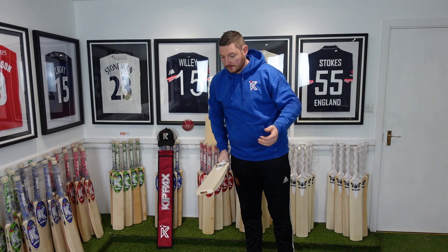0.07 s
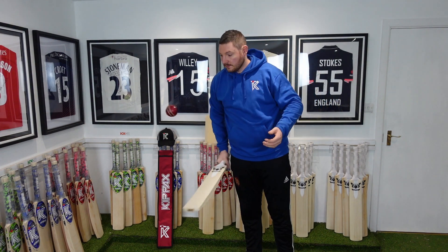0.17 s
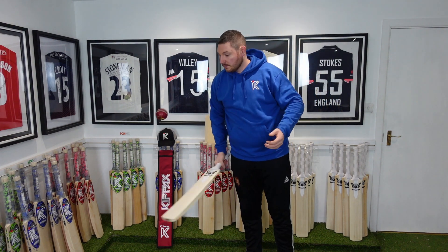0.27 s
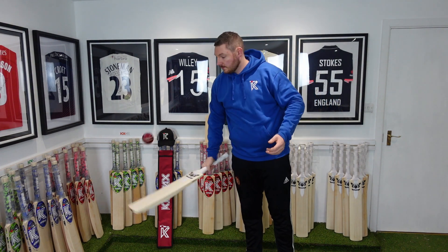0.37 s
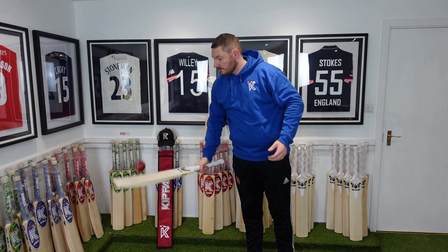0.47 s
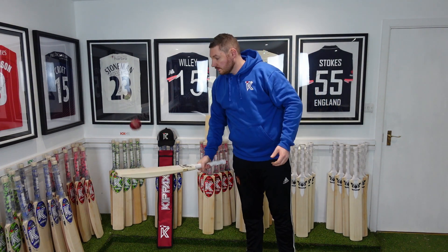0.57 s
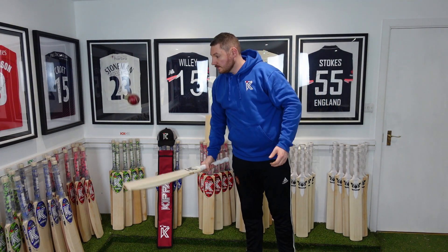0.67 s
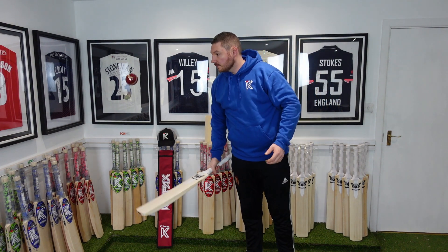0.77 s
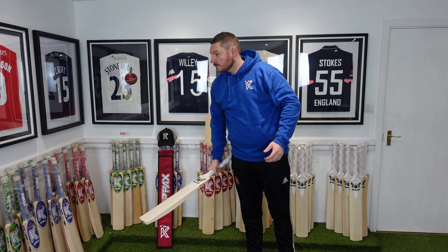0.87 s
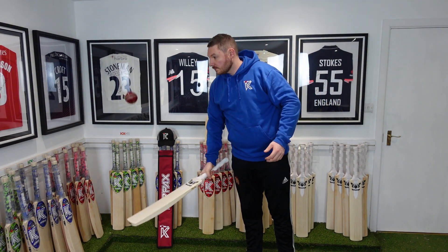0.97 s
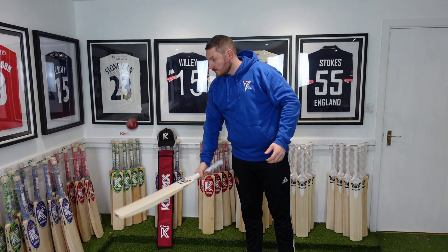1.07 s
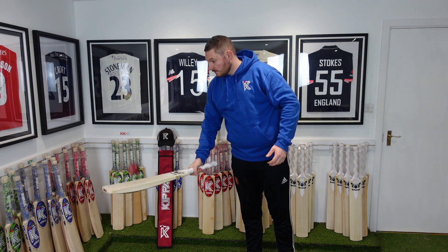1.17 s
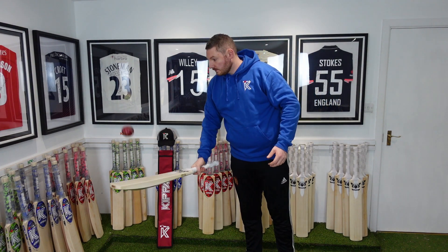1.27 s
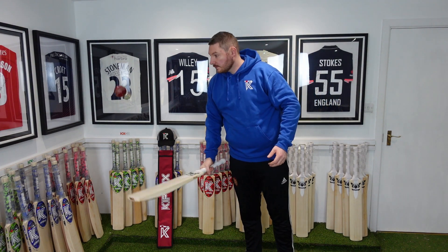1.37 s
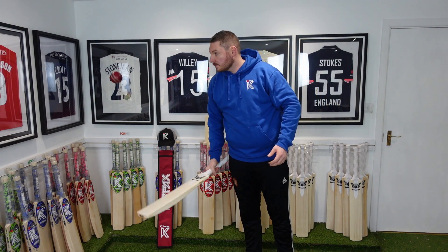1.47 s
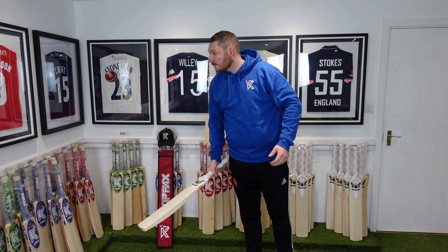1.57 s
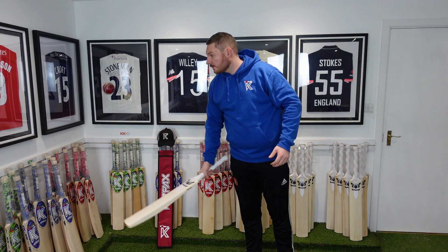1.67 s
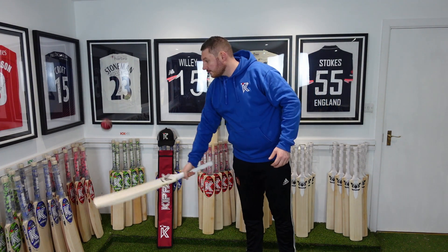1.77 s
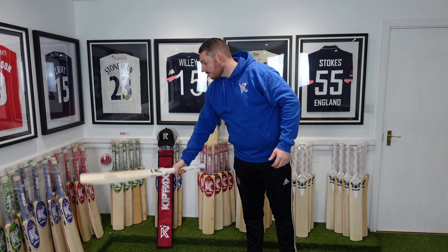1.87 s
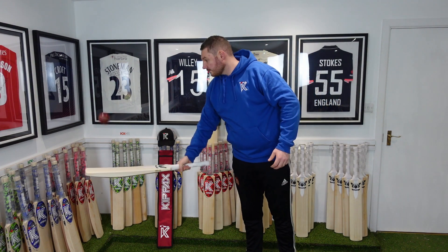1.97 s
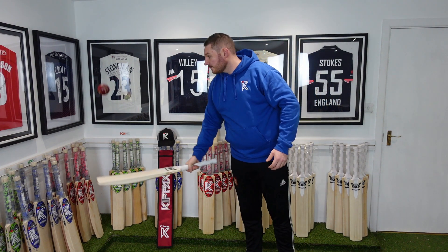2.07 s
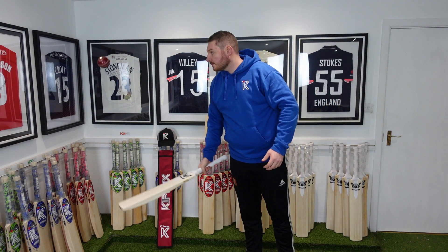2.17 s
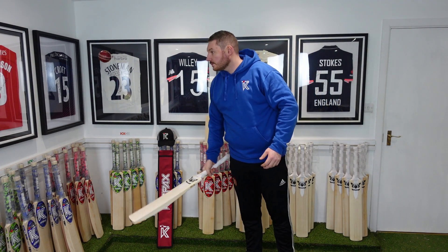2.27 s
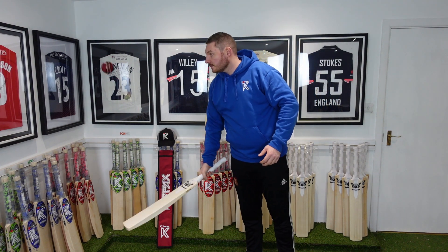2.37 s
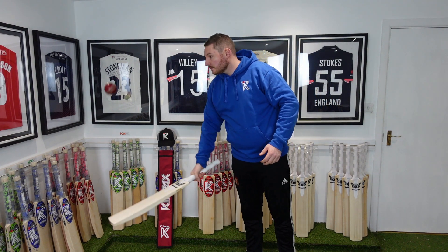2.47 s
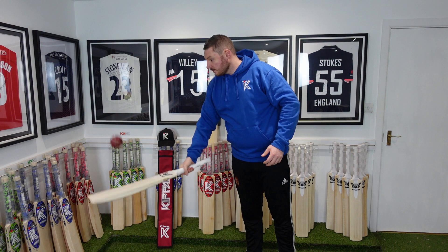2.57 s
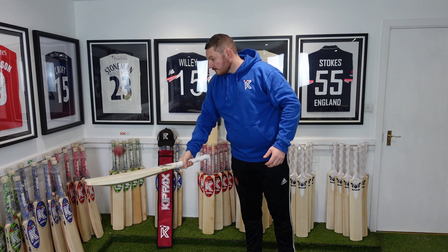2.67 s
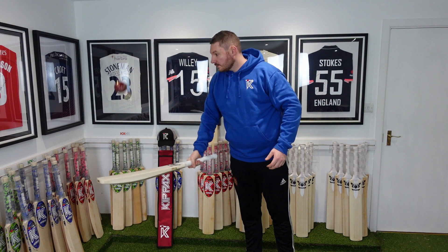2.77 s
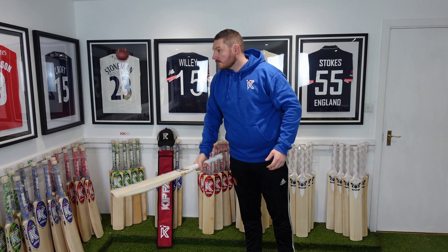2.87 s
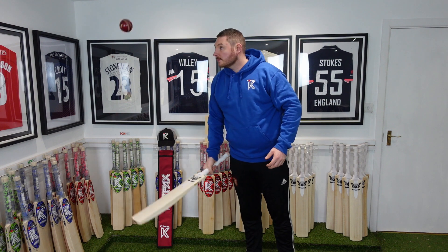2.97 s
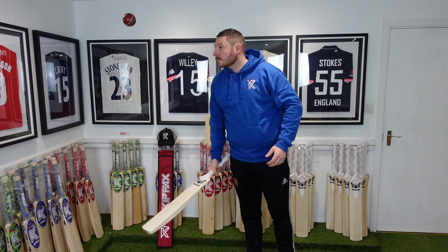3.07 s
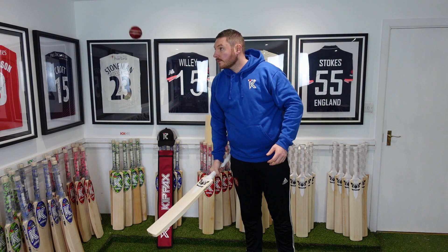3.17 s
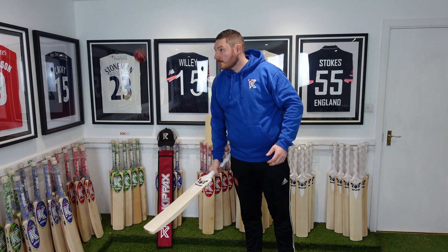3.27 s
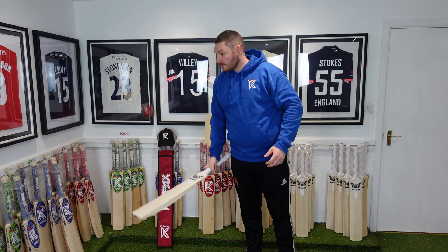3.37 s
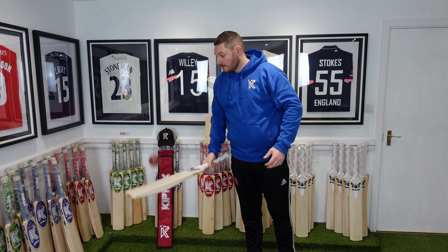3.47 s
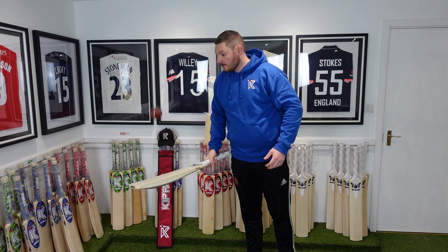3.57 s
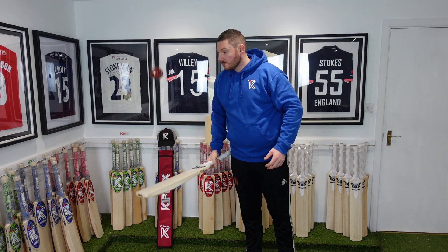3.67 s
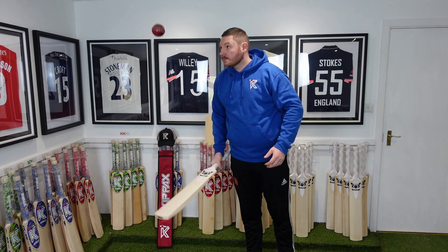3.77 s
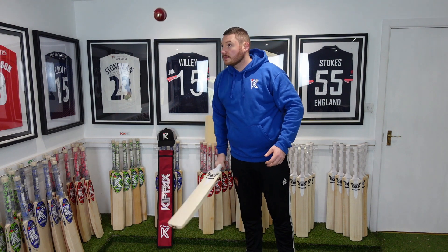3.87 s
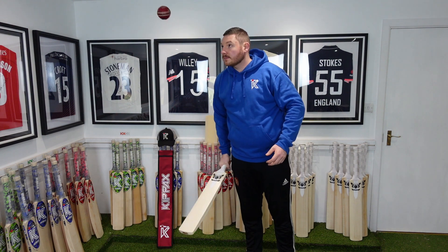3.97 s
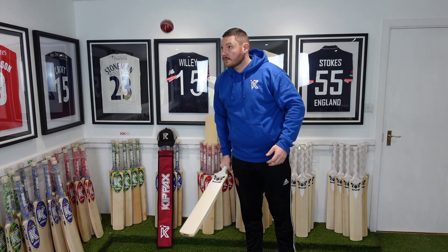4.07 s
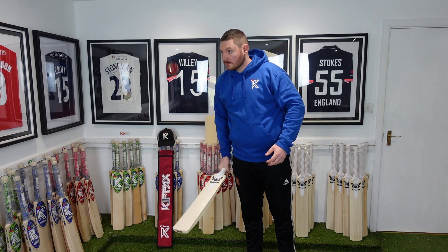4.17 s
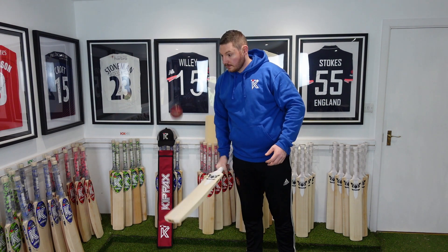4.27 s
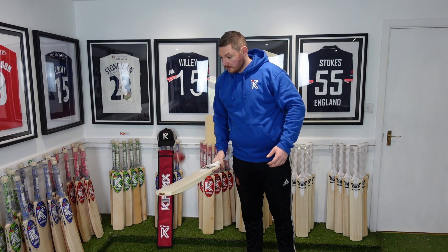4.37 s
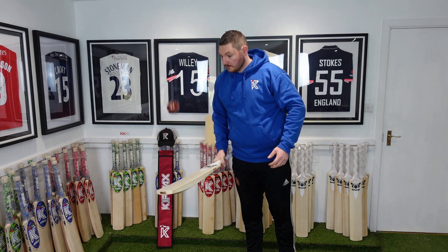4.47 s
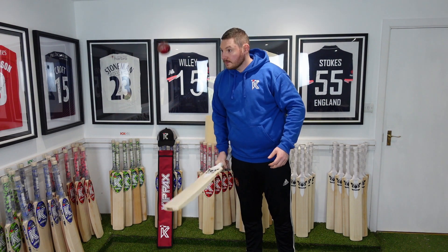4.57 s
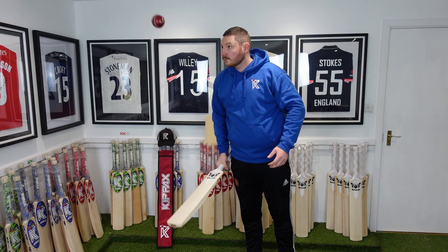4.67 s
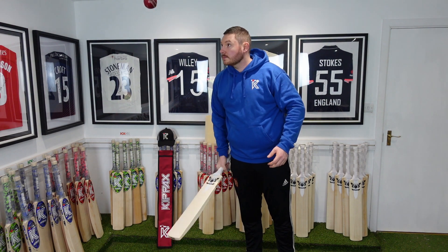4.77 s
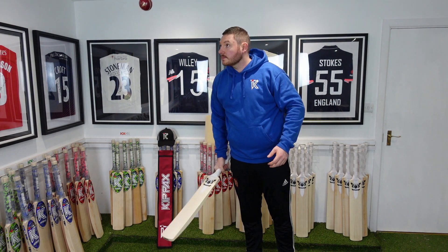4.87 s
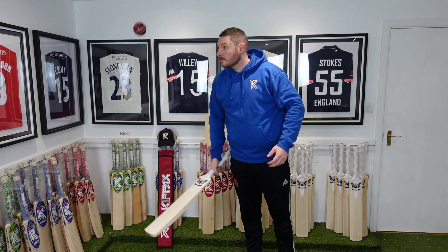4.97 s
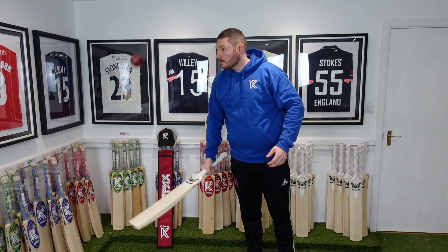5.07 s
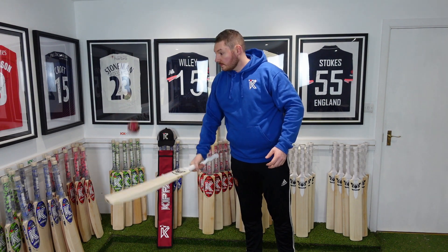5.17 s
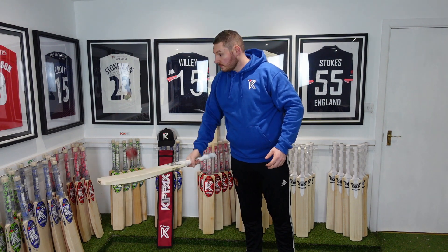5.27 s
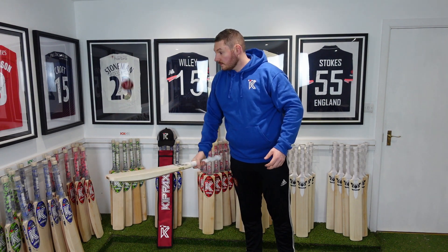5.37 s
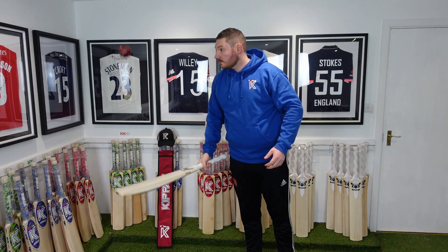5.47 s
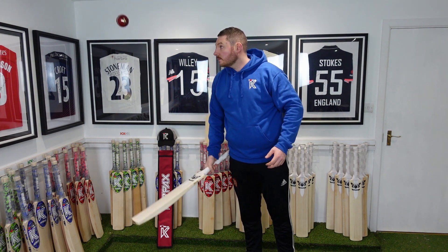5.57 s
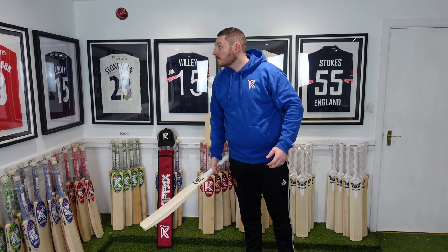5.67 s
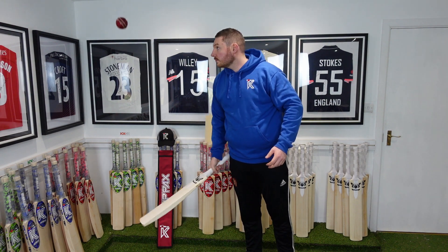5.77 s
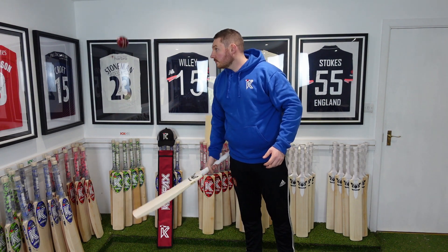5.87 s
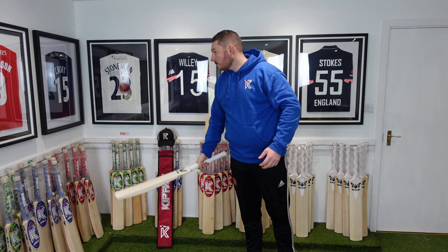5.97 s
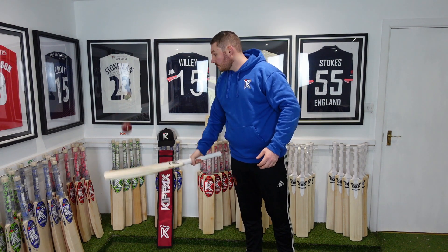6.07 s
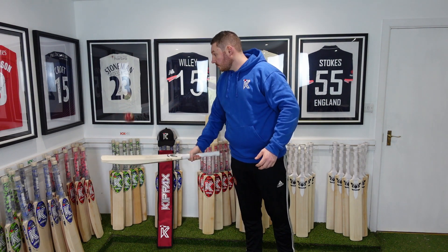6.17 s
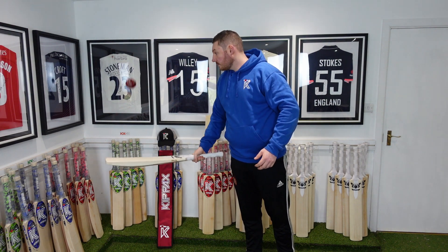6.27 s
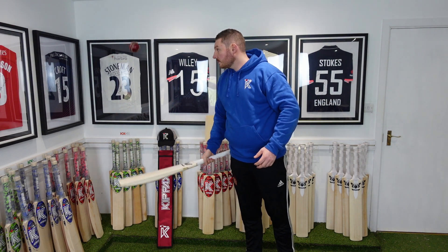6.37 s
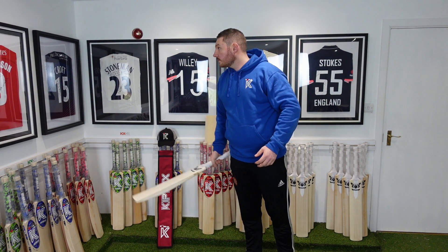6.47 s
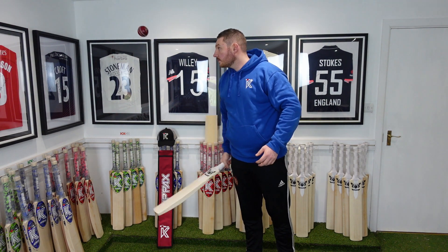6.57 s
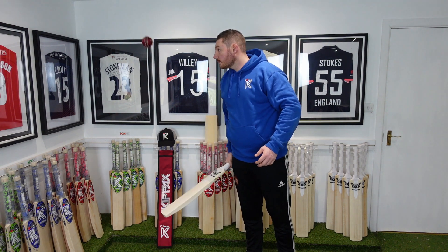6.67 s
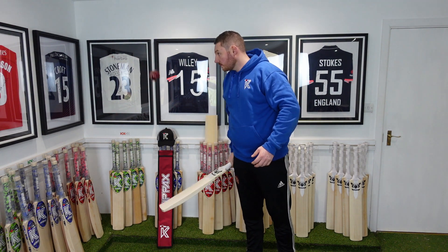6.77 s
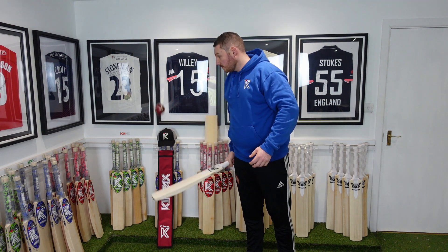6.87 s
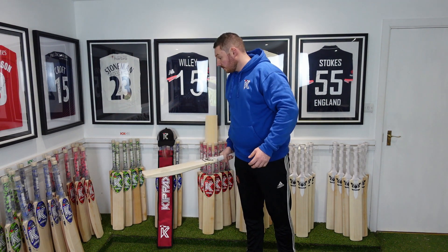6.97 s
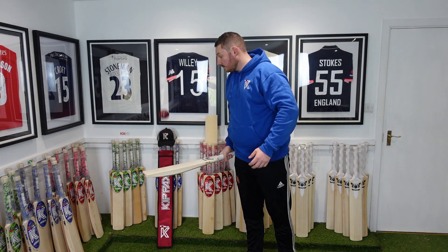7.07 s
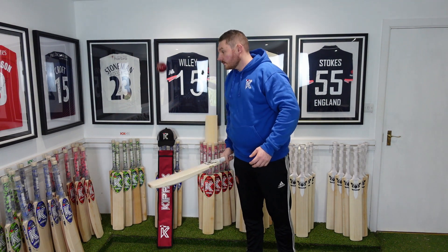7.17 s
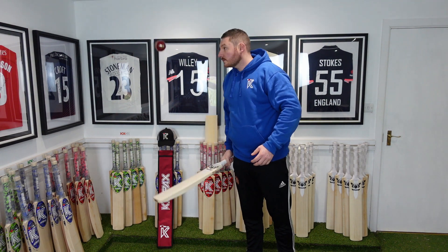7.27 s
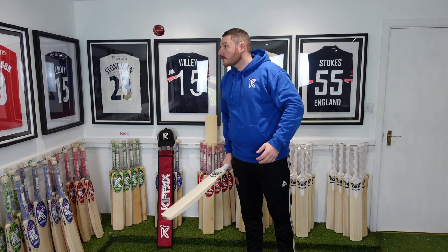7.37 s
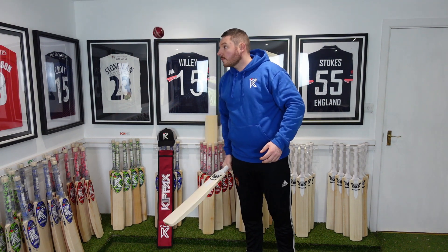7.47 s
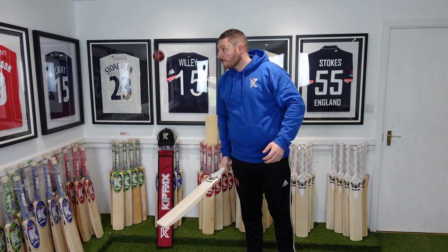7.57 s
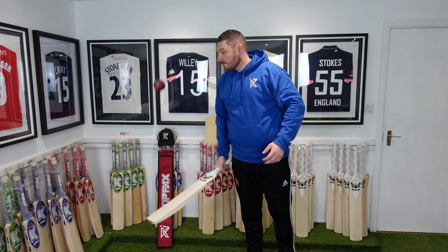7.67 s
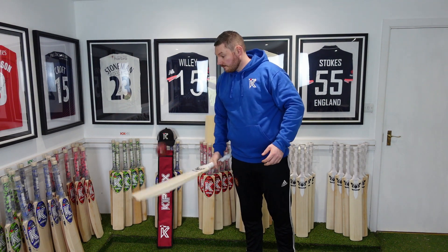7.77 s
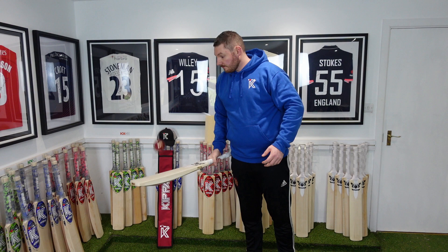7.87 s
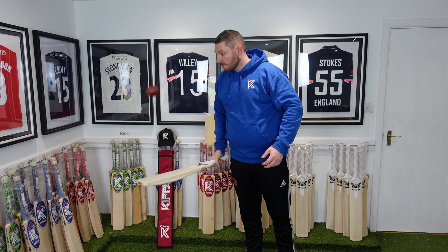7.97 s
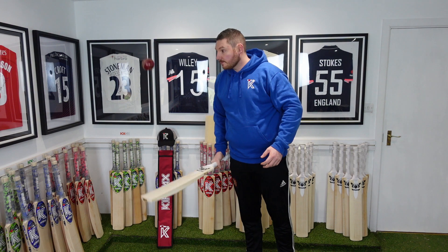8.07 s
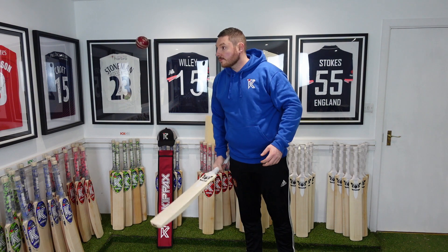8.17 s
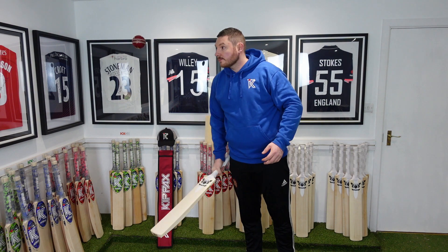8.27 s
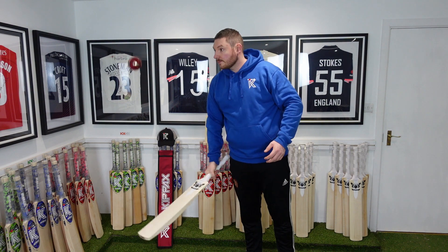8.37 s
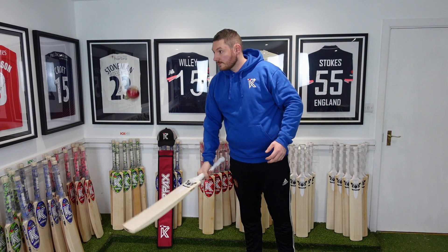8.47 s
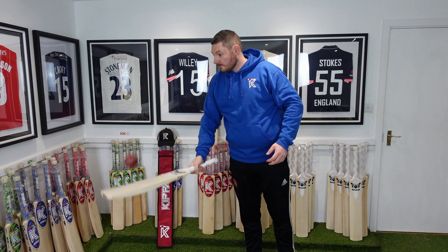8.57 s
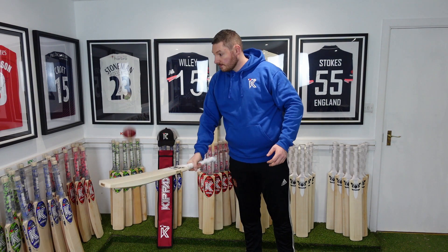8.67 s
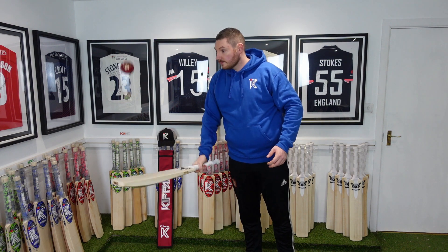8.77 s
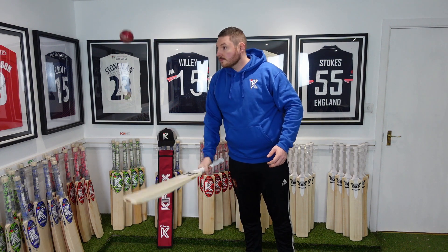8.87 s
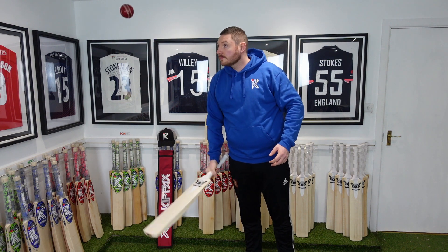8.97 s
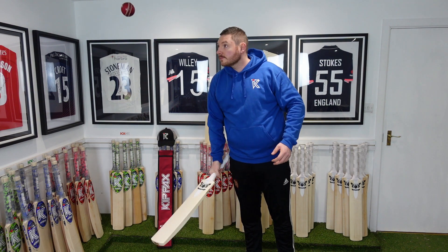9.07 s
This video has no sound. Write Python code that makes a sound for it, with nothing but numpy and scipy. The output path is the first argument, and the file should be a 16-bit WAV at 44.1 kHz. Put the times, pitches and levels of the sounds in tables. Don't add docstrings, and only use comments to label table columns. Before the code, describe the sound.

Sharp wooden knocks repeat for about nine seconds as someone keeps a hard ball bouncing on a bat. Early hits are rounder and woodier, middle ones brighter and more cracking, the last fuller again. Each leaves a short lively indoor tail with a faint sympathetic hum. Between them sit quiet traffic rumble, small shuffles and, near the end, a thin far-off brake squeal. Close stereo pickup, with the peaks tightly held down.

```python
import sys
import numpy as np
from scipy import signal
from scipy.io import wavfile
from scipy.ndimage import uniform_filter1d, minimum_filter1d

SR = 44100
rng = np.random.default_rng(int(sys.argv[2]) if len(sys.argv) > 2 else 0)


def attenuation_scalar(level_db):
    decades = np.asarray(level_db, float) / 20
    return 10 ** decades


def wrap_up_sound(samples):
    columns = np.atleast_2d(samples).T
    tamed = np.clip(columns, -1, 1)
    steps = np.round(tamed * 32767).astype(np.int16)
    wavfile.write(sys.argv[1], SR, steps)


N = 402633
RING = int(0.85 * SR)
THIRD_OCTAVES_HZ = 22 * 2 ** np.arange(0, 9.7, 1 / 3)


def at_hz(points, hz, axis=1):
    points = np.array(points)
    return np.interp(np.log(hz), np.log(points[:, 0]), points[:, axis])


def rms_one(x):
    return x / np.sqrt(np.mean(x ** 2) + 1e-20)


def band(x, low_hz, high_hz):
    sos = signal.butter(2, [low_hz, min(high_hz, 0.45 * SR)], "band", fs=SR, output="sos")
    return signal.sosfilt(sos, x)


def mode(hz, t60, t):
    return np.sin(2 * np.pi * hz * t) * attenuation_scalar(-60 * t / t60)


def add(out, x, start_s):
    i = max(round(start_s * SR), 0)
    out[:, i:i + x.shape[-1]] += x[..., :N - i]


# pitch_hz [Hz], level_db [dB], t60_s [s]
BLADE = [(348, -16.5, 0.033), (686, -3, 0.011), (850, -8.5, 0.0075), (1053, -8.5, 0.026), (1280, 2, 0.023),
         (1420, -4.5, 0.057)]


def push(db, low_db, t):
    contact_ms = 1.004 * attenuation_scalar(0.49 * (-16 - db))
    force = np.sin(np.pi * np.minimum(t * 1000 / contact_ms, 1)).clip(0) ** 2
    blade = 0
    for hz, level_db, t60 in BLADE:
        luck_db = 1.6 * rng.standard_normal()
        lean_db = low_db * np.log2(700 / hz)
        blade = blade + attenuation_scalar(level_db + lean_db + luck_db) * mode(hz, t60, t)
    air = -np.gradient(force) * attenuation_scalar(19.5)
    bend = np.convolve(force, blade)[:len(t)] * attenuation_scalar(-32.5)
    leather = signal.butter(2, 1700, fs=SR, output="sos")
    return signal.sosfilt(leather, signal.sosfilt(leather, air + bend))


# pitch_hz [Hz], width_hz [Hz], level_db [dB]
FACE = [(2190, 380, -1), (2760, 600, -13), (3160, 580, 1), (3740, 410, 4), (4500, 370, 1), (5300, 710, 3),
        (5900, 350, -2.5), (6800, 510, -7.5), (7210, 430, -3), (8120, 660, 2), (8870, 700, -7.5),
        (10400, 1100, -6.5), (11900, 900, -11), (13500, 3400, -17.5)]


def crack(tilt_db, spot_hz, t):
    scatter_db, spot_db, spot_width_hz = 2.5, -1.5, 280
    luck = np.diff(rng.standard_normal(len(FACE) + 1)) / np.sqrt(2)
    face = 0
    for (hz, width_hz, level_db), a in zip(FACE, luck):
        gain = attenuation_scalar(level_db + tilt_db * np.log2(hz / 4000) + scatter_db * a)
        face = face + gain * mode(hz, 1.3 / width_hz, t)
    peak = signal.iirpeak(spot_hz, spot_hz / spot_width_hz, SR)
    return face + attenuation_scalar(spot_db) * signal.lfilter(*peak, face)


def knock(db, tilt_db, low_db, spot_hz):
    t = np.arange(1500) / SR
    return push(db, low_db, t) - attenuation_scalar(-20 + 0.16 * low_db) * crack(tilt_db, spot_hz, t)


# pitch_hz [Hz], level_db [dB], t60_s [s]
PANES = [(152.4, -39.5, 0.76), (229.8, -34.5, 0.55), (255, -24, 0.58), (303.3, -24, 0.81),
         (327, -19.5, 0.74), (349.3, -26, 0.69), (394, -25, 0.4), (412.6, -26, 0.7), (451.5, -18, 0.66),
         (470.6, -21, 0.61), (589, -26.5, 0.55), (616, -23.5, 0.82), (678.6, -12, 0.64), (706.3, -18, .55)]


def sympathetic_ring(t):
    lag_s, lag_scatter_s = 0.00785, 0.00029
    level_scatter_db, sway_db = 1.3, 0.6
    luck = rng.standard_normal((len(PANES), 3))
    ring = 0
    for k, ((hz, level_db, t60), (a, b, c)) in enumerate(zip(PANES, luck)):
        pan_db = sway_db * np.array([[b], [-b]])
        gain = attenuation_scalar(level_db + level_scatter_db * a + pan_db)
        ring = ring + gain * (-1) ** k * mode(hz, t60, t - lag_s - lag_scatter_s * c)
    swell = 1 - np.exp(-t / 0.031)
    return attenuation_scalar(-1.5) * swell * ring


# pitch_hz [Hz], t60_s [s], tail_db [dB], side_minus_mid_db [dB]
ROOM = [(60, 1, -25.5, -17.5), (119, 0.62, -20.5, -18.5), (193, 0.43, -14, -16.5), (283, 0.65, -4.5, -35),
        (484, 0.52, -1.5, -13.5), (980, 0.47, 8, -11), (1590, 0.4, 2.3, -10), (2500, 0.38, 0.15, -8),
        (4000, 0.38, -0.3, -6.5), (7000, 0.3, 3, -10.5), (11100, 0.26, -2, -9.5),
        (15000, 0.14, -10.5, -2.5)]


def tails(count):
    same_place, same_below_hz, build_up_s = 0.17, 610, 0.064
    t = np.arange(RING) / SR
    white = rng.standard_normal((count + 1, 2, 2, RING))
    out = 0
    for k, (low, high) in enumerate(zip(THIRD_OCTAVES_HZ[3::2], THIRD_OCTAVES_HZ[5::2])):
        hz = np.sqrt(low * high)
        width_db = [[0], [at_hz(ROOM, hz, axis=3)]]
        gain = attenuation_scalar(at_hz(ROOM, hz, axis=2) - 60 * t / at_hz(ROOM, hz) + width_db)
        same = same_place + (1 - same_place) / (1 + (hz / same_below_hz) ** 2)
        same = np.clip(same, 0, 1)
        noise = band(white[:, k % 2], low, high)
        out = out + gain * (np.sqrt(same) * noise[0] + np.sqrt(1 - same) * noise[1:])
    mid, side = out[:, 0], out[:, 1]
    return np.stack([mid + side, mid - side], axis=1) * (1 - np.exp(-t / build_up_s))


# delay_ms [ms], level_db [dB], pan_db [dB]
ECHOES = [(0, -23.5, 0.5), (2.3, -15, 1.7), (5.2, -13, 0.2), (7.4, -26.5, -0.2), (10.5, -14.5, 4.5)]


def room_response(tail):
    room = attenuation_scalar(-20.5) * tail
    for delay_ms, level_db, pan_db in ECHOES:
        lag = round(delay_ms * (1 + 0.064 * rng.standard_normal()) * SR / 1000)
        room[:, lag] += attenuation_scalar(level_db + np.array([0.5, -0.5]) * pan_db)
    return room


# start_s [s], strength_db [dB], crack_tilt_db [dB per octave],
# low_lean_db toward the low modes [dB per octave], spot_hz of the place struck [Hz]
BLOWS = [(0.0, -18.5, -0.2, 6.5, 4100), (0.569, -16, -2, 7, 2600), (1.264, -18.5, -0.5, 5.5, 3900),
         (1.972, -16.5, -1.5, 6, 4400), (2.727, -17.5, -5.5, 4.5, 5750), (3.578, -17.5, 8, -5.1, 3450),
         (4.451, -16.5, 6.5, -3, 3150), (5.337, -17.5, 8, -1, 4500), (6.205, -19.5, 3, -4.4, 7500),
         (7.059, -17, -.1, -2.5, 6300), (7.912, -19, 2.5, -0.2, 5350), (8.697, -18, -3.5, 2.5, 3600)]


def bat():
    out, t = np.zeros((2, N)), np.arange(RING) / SR
    for (start_s, db, tilt_db, low_db, spot_hz), tail in zip(BLOWS, tails(len(BLOWS))):
        dry_knock = knock(db, tilt_db, low_db, spot_hz)
        wet = signal.fftconvolve(room_response(tail), dry_knock[None])[:, :RING]
        add(out, attenuation_scalar(db + 18.5) * (wet + sympathetic_ring(t)), start_s)
    return out


# pitch_hz [Hz], density_db [dB per Hz]
HUM = [(15, -45), (25, -38.5), (53, -3.5), (85, -7), (131, 5), (170, -6), (329, -9.5), (552, -18.5),
       (1210, -26.5), (1590, -26.5), (2520, -36), (15100, -47.5), (16400, -47)]
# start_s [s], nearness_db [dB]
TRAFFIC = [
    (0, 11.5),
    (1.8, 9),
    (3.398, 2.3),
    (6.099, 0),
    (8.399, 3.7),
    (9.13, 10.5),
]


def traffic():
    rumble_db, rumble_follows = -62, 0.07
    patchy_db, patch_s, mono_above_hz = 2.5, 0.022, 5500
    t = np.arange(N) / SR
    hiss_db = np.interp(t, *np.transpose(TRAFFIC))
    white, out, power = rng.standard_normal((2, 2, N)), 0, 0
    for k, (low, high) in enumerate(zip(THIRD_OCTAVES_HZ[::2], THIRD_OCTAVES_HZ[2::2])):
        hz = np.sqrt(low * high)
        mid, side = attenuation_scalar(at_hz(HUM, hz)) * band(white[k % 2], low, high)
        power += np.mean(mid ** 2)
        width = attenuation_scalar(at_hz(ROOM, hz, axis=3) + 9.5) / (1 + (hz / mono_above_hz) ** 4)
        side = side * width * [[1], [-1]]
        patches = np.interp(t / patch_s, np.arange(1000), rng.standard_normal(1000))
        follows_cars = np.clip(np.log2(hz / 500) / 1.2, 0, 1)
        out = out + attenuation_scalar((hiss_db + patchy_db * patches) * follows_cars) * (mid + side)
    return attenuation_scalar(rumble_db + rumble_follows * hiss_db) * out / np.sqrt(power)


# start_s [s], level_db [dB], centre_hz [Hz], width_oct [octaves],
# rise_s [s]
RUSTLES = [
    (1.839, -55.5, 4000, 1.6, .074),
    (3.47, -46, 434, .8, 0.065),
    (.53, -76.5, 7800, .6, 0.0035),
    (4.06, -78.5, 5030, 2.5, 0.002),
    (5.118, -67, 2700, 0.94, 0.0045),
    (5.125, -52.5, 284, .9, .006),
    (6.045, -69.5, 1400, 1.9, .02),
    (7.509, -78.5, 3000, 0.94, .004),
    (8.91, -50, 2600, 0.72, 0.088),
]


def rustles():
    out, t = np.zeros((2, N)), np.arange(SR // 2) / SR
    for start_s, db, hz, octaves, rise_s in RUSTLES:
        half = 2 ** (octaves / 2)
        mid, side = rms_one(band(rng.standard_normal((2, len(t))), hz / half, hz * half))
        t60 = 0.49 + 4.7 * rise_s
        envelope = attenuation_scalar(db - 60 * t / t60) * np.minimum(t / rise_s, 1)
        add(out, (mid + 0.31 * side * [[1], [-1]]) * envelope, start_s)
    return out


# start_s [s], held_s [s], pitch_hz
# [Hz], width_hz [Hz], level_db [dB]
SQUEALS = [
    (1.618, 0.14, 4550, 170.2, -78.5),
    (7.797, .16, 5520, 90, -66.5),
    (7.998, 0.35, 5180, 100, -58.5),
    (8.049, .45, 1790, 111, -71.5),
    (8.948, .2, 4920, 350, -68),
    (5.75, .4, 1700, 109, -82),
    (8.9, .25, 3420, 250, -79),
]


def squeals():
    attack_s, fall_db_s, octave_db = 0.011, 79, -30
    out, t = np.zeros((2, N)), np.arange(SR) / SR
    for start_s, held_s, hz, width_hz, db in SQUEALS:
        release = attenuation_scalar(-fall_db_s * np.maximum(t - held_s, 0)) * (1 - t)
        envelope = np.minimum(t / attack_s, 1) * release
        for k, level_db in ((1, db), (2, db + octave_db)):
            noise = rng.standard_normal((2, SR))
            mid, side = rms_one(band(noise, k * (hz - width_hz / 2), k * (hz + width_hz / 2)))
            add(out, (mid + 0.45 * side * [[1], [-1]]) * envelope * attenuation_scalar(level_db), start_s)
    return out


def scene():
    return bat() + traffic() + rustles() + squeals()


def limiter(x):
    ceiling_db, grip, release_db_s = -14, 1.197, 193
    look_ahead_s, sense_s = 0.025, 0.0045
    power = uniform_filter1d((x ** 2).max(axis=0), max(round(sense_s * SR), 1))
    sensed = np.sqrt(power.clip(0))
    over_db = grip * np.maximum(20 * np.log10(sensed + 1e-9) - ceiling_db, 0)
    ramp = release_db_s * np.arange(N) / SR
    held = np.maximum.accumulate(over_db + ramp) - ramp
    ahead = round(look_ahead_s * SR)
    early = -minimum_filter1d(-held, 2 * ahead + 1)
    return x * attenuation_scalar(-uniform_filter1d(early, ahead))


def band_limit(x):
    return signal.sosfilt(signal.butter(12, 16550, fs=SR, output="sos"), x)


def record(dry):
    port_split_hz, mic_low_hz, top_hz = 330, 90, 16950
    mid = dry.mean(axis=0)
    side = signal.sosfilt(signal.butter(2, port_split_hz, "high", fs=SR, output="sos"), dry - mid)
    x = signal.sosfilt(signal.butter(2, mic_low_hz, "high", fs=SR, output="sos"), mid + side)
    x = signal.sosfilt(signal.cheby2(10, 60, top_hz, fs=SR, output="sos"), limiter(x))
    return band_limit(x)


dry = scene()
out = record(dry)
wrap_up_sound(out)
```